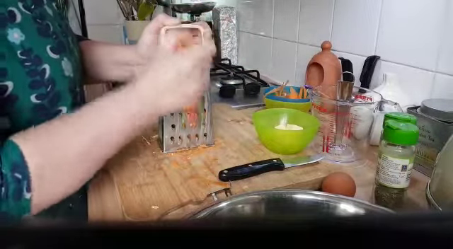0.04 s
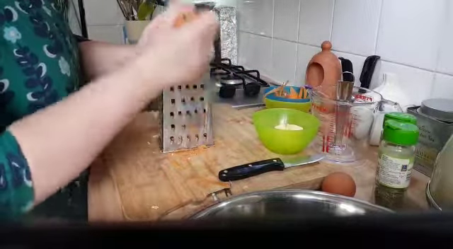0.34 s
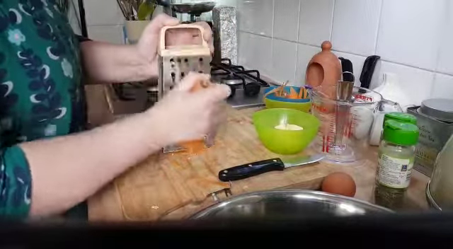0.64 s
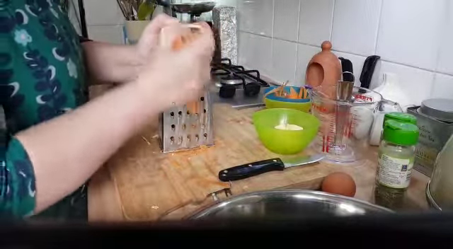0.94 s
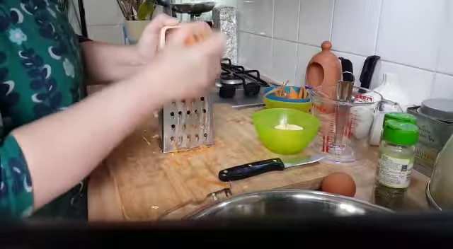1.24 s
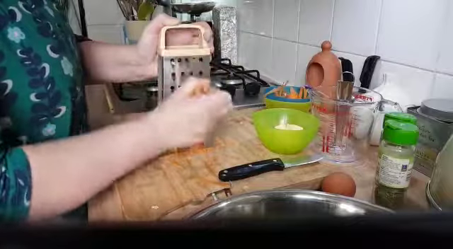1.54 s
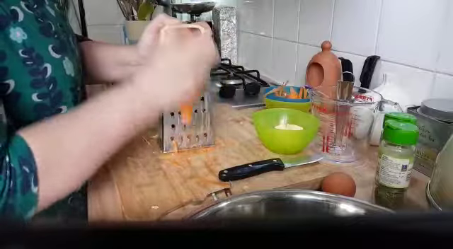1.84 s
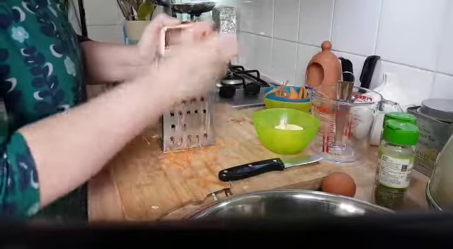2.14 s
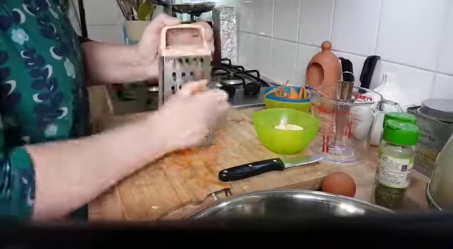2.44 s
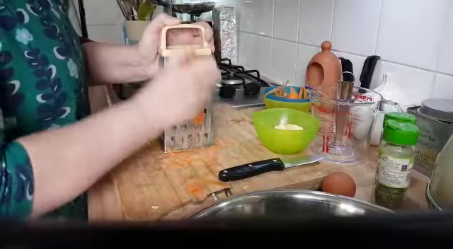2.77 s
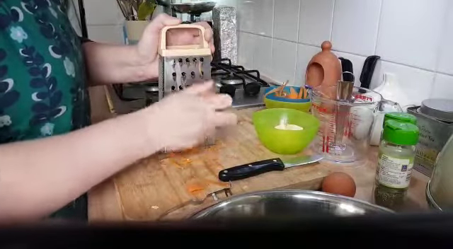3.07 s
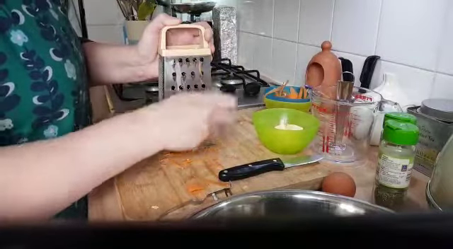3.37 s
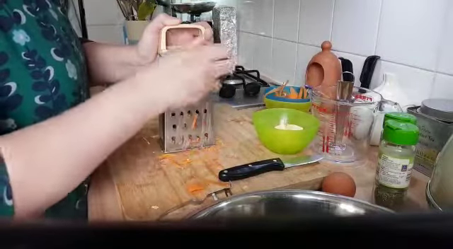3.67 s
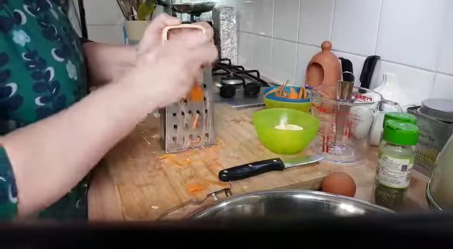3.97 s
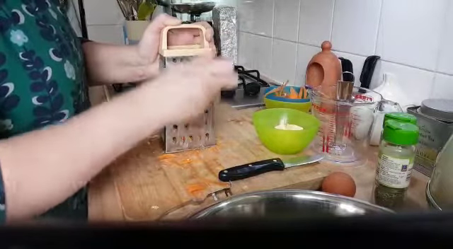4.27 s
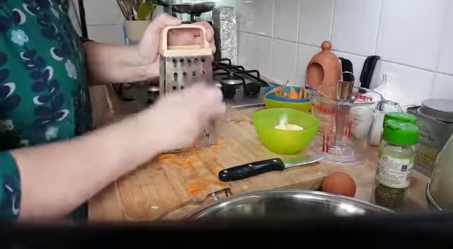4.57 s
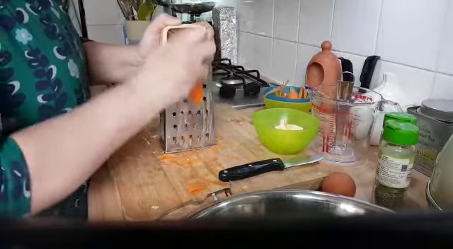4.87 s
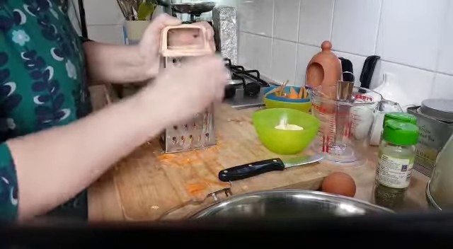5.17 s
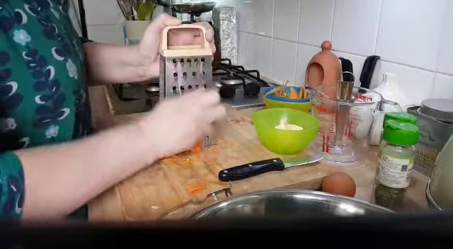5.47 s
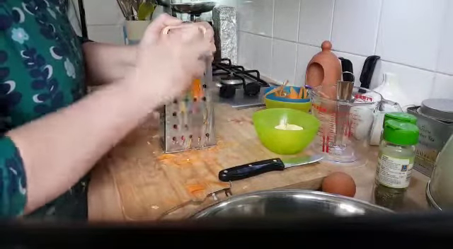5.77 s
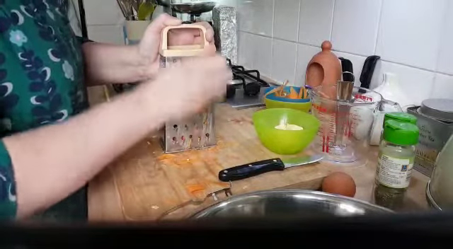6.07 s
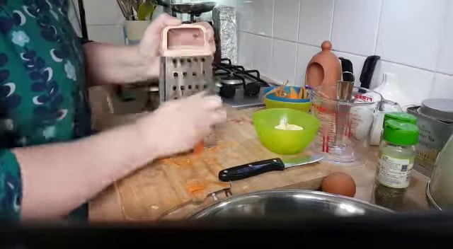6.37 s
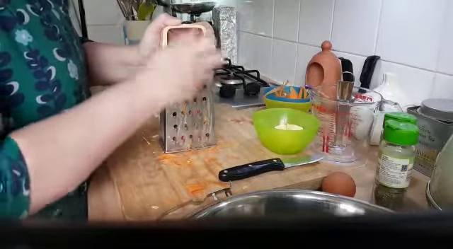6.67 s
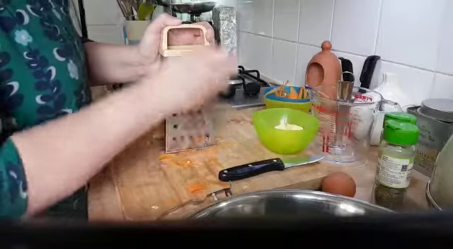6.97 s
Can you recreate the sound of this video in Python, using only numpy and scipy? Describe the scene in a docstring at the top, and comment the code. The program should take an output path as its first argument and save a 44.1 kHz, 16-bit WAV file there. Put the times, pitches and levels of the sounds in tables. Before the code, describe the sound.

A carrot is rubbed down a steel box grater about twice a second, each stroke a bright crunch with a hollow metallic rasp. Most strokes end in a dull thud through a wooden board and a brief rattle of the grater's rim, followed by a faint slide back up. The grating pauses for about a second near the middle, then resumes. It is heard from nearby in a tiled kitchen with a faint appliance hum.

```python
"""Rhythmic crunch and hollow rasp: a carrot on a steel box grater, on a wooden board in a tiled kitchen.
On each downstroke the teeth tear the fibres (bright crunch) and shake the sheet (rasp).
Most strokes end in a dull thud through the board and a brief rattle of the rim.
The carrot slides lightly back up, and once the hand pauses. Room air and appliance hum lie underneath."""
import sys
import numpy as np
from scipy import signal
from scipy.fft import rfft, irfft, next_fast_len
from scipy.io import wavfile

SR = 44100
rng = np.random.default_rng(int(sys.argv[2]) if len(sys.argv) > 2 else 0)


def unload_audio(sound):
    """Save the sound as a 16-bit wav file, at the path given as the first command line argument."""
    columns = np.transpose(np.atleast_2d(sound))
    # keep every value between -1 and 1, then stretch to whole-number steps
    steps = np.round(np.clip(columns, -1, 1) * 32767)
    wavfile.write(sys.argv[1], SR, steps.astype(np.int16))


N = 318402

# Pushes down the teeth. Levels in all tables are relative.
# t/s, length/s, bite time/s, crunch/dB, rasp/dB, swell top to foot/dB, mid-stroke arch/dB
DOWNSTROKES = [(-.024, 0.17, 0.042, -33, -32.5, 2.1, -2.5), (.407, 0.19, 0.041, -33, -34, 13.5, 6.5),
               (0.875, .2, 0.022, -32.5, -34, 13.5, 10.5), (1.333, 0.19, 0.027, -34, -34.5, 13, 3.5),
               (1.782, .158, 0.029, -32, -32, 14, 5), (2.198, 0.17, 0.031, -38.5, -38, 24.5, 0.5),
               (2.664, .197, 0.06, -36.5, -36.5, 16.5, 4.6), (3.939, 0.17, 0.027, -40.5, -37, 6.3, -3),
               (4.439, 0.19, 0.033, -33, -33, 4.5, 11), (4.86, .168, 0.044, -34, -35, 3.5, 2),
               (5.297, 0.2, 0.079, -33, -33, -0.5, -1.6), (5.753, 0.18, 0.031, -32.5, -32.5, 12, 8.5),
               (6.182, 0.16, 0.068, -35.5, -35, 11, -2), (6.628, 0.18, 0.017, -33.3, -34, 23, 15),
               (7.045, .17, .049, -36.1, -36, 23.5, 10)]


def downstrokes(bite_exponent=1.83, rasp_swell_db=5.5, crunch_stop_db_per_s=848.5, rasp_stop_db_per_s=427):
    """Crunch and rasp gains: the teeth bite, the push swells towards the foot, the carrot stops."""
    crunch, rasp = np.zeros(N), np.zeros(N)
    for start, length, bite, crunch_db, rasp_db, swell_db, arch_db in DOWNSTROKES:
        t = np.arange(N) / SR - start
        grip = np.sin(np.pi / 2 * np.clip(t / bite, 0, 1)) ** bite_exponent
        travel = np.clip(t / length, 0, 1) - .5  # top -0.5, foot +0.5
        stopped_s = np.clip(t - length, 0, 1)
        press = grip * from_db(swell_db * travel - arch_db * (2 * travel) ** 2)
        crunch += press * from_db(crunch_db - crunch_stop_db_per_s * stopped_s)
        rasp += press * from_db(rasp_db + rasp_swell_db * travel - rasp_stop_db_per_s * stopped_s)
    return crunch, rasp


# Slides back up: t/s, length/s, rub/dB, wet hiss/dB
UPSTROKES = [(0.222, 0.18, -51.5, -65), (0.684, .1, -56.5, -69), (1.185, 0.3, -51, -65),
             (1.628, 0.16, -54, -77), (2.032, 0.19, -53.5, -78), (2.537, 0.22, -78, -70.5),
             (3.824, 0.21, -60, -73), (4.18, 0.22, -58.5, -67), (4.69, 0.33, -63, -69),
             (5.124, 0.21, -55, -61.5), (5.58, 0.19, -52, -63), (6.019, 0.21, -62, -76),
             (6.442, 0.12, -57, -81), (6.87, 0.071, -60, -66)]


def upstrokes(ease_db=11.5, fade_s=0.016):
    """Hiss and rub gains: the carrot slides up with less and less weight on it."""
    hiss, rub = np.zeros(N), np.zeros(N)
    for start, length, rub_db, hiss_db in UPSTROKES:
        t = np.arange(N) / SR - start
        touch = np.clip(1 + np.minimum(t, length - t) / fade_s, 0, 1)
        weight = touch * from_db(ease_db * (.5 - np.clip(t / length, 0, 1)))
        hiss += weight * from_db(hiss_db)
        rub += weight * from_db(rub_db)
    return hiss, rub


# Scuffs on the teeth, pieces snapping off: t/s, crunch/dB, tap on the sheet/dB, t60/s
SCUFFS_AND_SNAPS = [(.352, -76, -57, 0.072), (.719, -66, -51, 0.06), (1.192, -68, -44, 0.064),
                    (1.242, -56.5, -51, 0.041), (1.293, -63.5, -50, 0.051), (1.593, -38.5, -55, 0.046),
                    (1.626, -67, -41.5, 0.079), (1.772, -86, -50, 0.073), (2.069, -70, -50, 0.037),
                    (2.104, -74, -51, 0.042), (2.3725, -28, -13.5, 0.019), (3.1313, -58, -58.5, 0.17),
                    (3.458, -84, -65.5, 0.083), (3.643, -66, -64, 0.16), (3.767, -64.5, -63, 0.094),
                    (3.819, -60, -50.5, 0.052), (4.239, -62, -53, 0.077), (4.416, -50, -51, 0.12),
                    (4.689, -61, -61, 0.052), (5.252, -74, -53, .07), (6.136, -64, -54, .1),
                    (6.3408, -19.5, -40, 0.025), (6.471, -66, -46, 0.045), (6.599, -58, -50.5, 0.14),
                    (6.899, -61, -52, .06)]
# Tearing fibres: f/Hz, density/dB
CRUNCH_SPECTRUM = [(500, -15.5), (1500, -5.5), (2600, -2), (4500, -5), (6900, -5.5), (8200, 0),
                   (9700, -3.5), (12300, -2), (13800, -5.5), (16000, -9)]


def fibres(crunch, hiss):
    """Thousands of wet cells burst each second under the teeth; bigger pieces go with a snap."""
    tearing = from_db(-3.5) * crunch * grains(per_s=7000, spread_db=1.5)
    snaps = sum(bursts([start], [db], t60, rise_share=.04) for start, db, _, t60 in SCUFFS_AND_SNAPS)
    fizz = (from_db(-10) * hiss + snaps) * grains(per_s=14000)
    return radiate(tearing + fizz, CRUNCH_SPECTRUM, band_hz=(5000, 16000))


# Shaken steel sheet: f/Hz, density/dB
RASP_SPECTRUM = [(25, -36), (45, 10.5), (90, 9), (150, -3), (250, -14), (400, -5.5), (650, -1), (1100, -6),
                 (1550, -1.5), (2100, -11.5), (2600, -18), (4500, -17), (8000, -29), (16000, -37.5)]
# Steel box resonances: f/Hz, width/Hz, lift/dB
BOX_RESONANCES = [(469.7, 31, 6.5), (629, 27, 5.5), (692, 14.2, 10), (760.3, 21, 9.5), (835, 49, 6.5),
                  (1013, 22, 5), (1058, 15, 5), (1206, 14, -3), (1325, 21, 5), (1416, 19, 0),
                  (1605, 61, 7.5), (1790, 47, 3.5), (1926, 66, 5.5), (2324, 29, 13.5), (2557, 120, 13.5),
                  (3164, 71, 11.5), (3710, 66, 8)]


def sheet(rasp, rub):
    """Each tooth that lets go plucks the steel box; the upstroke rubs it and scuffs tap it."""
    plucks = from_db(-2.5) * rasp * grains(per_s=4000, spread_db=2)
    taps = sum(bursts([start], [db], t60, rise_share=0.066) for start, _, db, t60 in SCUFFS_AND_SNAPS)
    scraping = (from_db(-10) * rub + taps) * grains(per_s=7800)
    return radiate(plucks + scraping, RASP_SPECTRUM, band_hz=(400, 2500), resonances=BOX_RESONANCES)


def steel_box(clicks, ring_db=-6.5, t60_s=0.029, hop=2048):
    """Clicks bounce inside the box, by new paths as the carrot moves from tooth to tooth."""
    decay = from_db(-60 * np.arange(2 * hop) / SR / t60_s)
    decay *= from_db(ring_db) / np.linalg.norm(decay)
    window = signal.windows.cosine(2 * hop)
    rings = np.zeros((2, N + 4 * hop))
    for start in range(0, N, hop):
        piece = clicks[:, start:start + 2 * hop]
        paths = decay * rng.standard_normal((2, 2 * hop))
        ring = signal.fftconvolve(piece * window[:piece.shape[1]], paths, axes=1)
        rings[:, start:start + ring.shape[1]] += ring
    return (clicks + rings[:, :N]) / np.hypot(1, from_db(ring_db))


# Hand landing at the foot of a stroke: t/s, thud/dB, rim rattle/dB, contact/s
LANDINGS = [(0.1359, -13.5, -30, 0.006), (0.5946, -17, -34.5, 0.0029), (1.068, -20.5, -37, .0048),
            (1.523, -26.5, -35.5, 0.0069), (1.921, -44, -39.5, 0.005), (2.373, -13, -19.5, 0.0041),
            (2.857, -15.5, -32.5, 0.0034), (3.14, -30.5, -64.5, 0.0049), (4.1063, -10.5, -29, 0.006),
            (5.021, -14.5, -27.5, 0.0078), (5.499, -15, -38, 0.0079), (5.922, -25.5, -36, 0.0074),
            (6.3434, -17, -31, 0.0036), (6.81, -25, -45, .0056)]
# Board and worktop modes: f/Hz, level/dB, t60/s
BOARD_MODES = [(49.8, -13, 0.81), (52.7, -25.5, .45), (64, 1.5, 0.06), (86.2, 6, 0.12), (117.3, 2.5, 0.039),
               (130.25, -23.5, 0.69), (158, -29, .15), (226, -27.5, 0.31)]


def board(rebound_s=.07, rebound_db=-15):
    """A soft push through the grater's foot, then a weaker one as it rocks back."""
    t = np.arange(SR) / SR
    pushes = np.zeros(N + 2 * SR)
    for start, thud_db, _, contact_s in LANDINGS:
        contact = np.sin(np.pi * np.minimum(t / contact_s, 1))
        for delay_s, push_db in (0, -1.5), (rebound_s, rebound_db):
            first = int((start + delay_s) * SR)
            pushes[first:first + SR] += from_db(thud_db + push_db) * contact / contact.sum()
    # neighbouring modes start opposed, so the thud takes a cycle to swell
    swing = sum((-1) ** k * from_db(db - 60 * t / t60) * np.sin(2 * np.pi * hz * t)
                for k, (hz, db, t60) in enumerate(BOARD_MODES))
    return signal.fftconvolve(pushes[:N], swing)[:N]


# Rim knocking on wood: f/Hz, density/dB
RIM_SPECTRUM = [(60, 5), (130, 17.5), (210, -2), (290, -7.5), (480, 1.5), (700, 2.5), (1100, -2.5),
                (1500, -9.5), (2500, -14.5), (6000, -31), (16000, -46)]


def rim(lag_s=0.0054):
    """The grater's lower rim rattles on the wood just after the hand lands."""
    times, _, rattle_db, _ = np.transpose(LANDINGS)
    envelope = from_db(-1) * bursts(times + lag_s, rattle_db, t60_s=0.077, rise_share=0.033)
    return radiate(envelope * grains(per_s=5000), RIM_SPECTRUM, band_hz=(400, 2500))


# Tiled room: f/Hz, t60/s
KITCHEN_DECAY = [(100, 0.72), (500, 0.45), (1500, 0.29), (4000, 0.31), (8000, 0.27), (16000, 0.18)]


def kitchen(sound, first_echo_s=0.0052):
    """Dense echoes from the tiles; the treble dies first."""
    t = np.arange(int(.8 * SR)) / SR
    edges_hz = np.geomspace(40, 18000, 10)
    response = np.zeros((2, len(t)))
    for low, high in zip(edges_hz, edges_hz[1:]):
        t60_s = at_hz(KITCHEN_DECAY, np.sqrt(low * high))
        decay = from_db(-60 * t / t60_s) * (t > first_echo_s)
        bandpass = signal.butter(2, [low, high], "band", fs=SR, output="sos")
        noise = signal.sosfilt(bandpass, rng.standard_normal((2, len(t))))
        response += noise * decay / np.linalg.norm(decay)
    return signal.fftconvolve(sound, response, axes=1)[:, :N]


# Room air: f/Hz, density/dB
AIR_SPECTRUM = [(20, -10.5), (50, 11.5), (90, -2), (150, -6), (250, -9), (430, -15), (680, -17),
                (1000, -23.5), (1500, -30.5), (2000, -38), (2500, -40), (7000, -43.5), (8200, -37.5),
                (13000, -33.5)]
# Appliance tones: f/Hz, level/dB
HUM_TONES = [(101, -56.5), (301, -71), (11989, -81)]


def background():
    """Quiet room air; appliances add a low hum and a faint whine in the centre."""
    t = np.arange(N) / SR
    air = radiate(rng.standard_normal((2, N)), AIR_SPECTRUM, band_hz=(400, 2500))
    hum = sum(np.sqrt(2) * from_db(db) * np.sin(2 * np.pi * hz * t + rng.uniform(0, 2 * np.pi))
              for hz, db in HUM_TONES)
    return from_db(-70.5) * air + hum * np.array([[1], [0]])


# Stereo width: f/Hz, side minus mid/dB
STEREO_WIDTH = [(60, -10), (150, -9), (330, -8.5), (500, -6.5), (770, -5), (1170, 4.5), (1800, -2),
                (4200, 1.5), (15000, 0)]


def radiate(drive, spectrum, band_hz, resonances=()):
    """Colour a mid/side drive; white noise of rms 1 gives a mid of rms 1 inside band_hz."""
    size = next_fast_len(N + SR // 2)
    hz = np.arange(size // 2 + 1) * SR / size
    lift = sum((from_db(db) ** 2 - 1) / (1 + (2 * (hz - f) / width) ** 2) for f, width, db in resonances)
    gain = from_db(at_hz(spectrum, hz)) * np.sqrt(np.maximum(1 + lift, 1e-3))
    gain /= np.sqrt(np.mean(gain ** 2 * (hz > band_hz[0]) * (hz < band_hz[1])))
    cepstrum = irfft(np.log(gain), size)[:size // 2]
    causal = np.exp(rfft(np.r_[cepstrum[0], 2 * cepstrum[1:]], size))  # rings only after the click
    stereo = [np.ones_like(hz), from_db(at_hz(STEREO_WIDTH, hz))]
    return irfft(rfft(drive, size) * causal * stereo, size)[:, :N]


def grains(per_s, spread_db=0):
    """Random mid/side clicks, rms 1."""
    onsets = rng.random(N) < per_s / SR
    sizes = from_db(spread_db * rng.standard_normal(N))
    clicks = onsets * sizes * rng.choice([-1, 1], (2, N))
    return clicks / clicks.std()


def bursts(times_s, levels_db, t60_s, rise_share):
    """Envelope that swells at each time and dies away; the rise time is a share of t60."""
    kicks = np.zeros(N)
    kicks[(np.asarray(times_s) * SR).astype(int)] = from_db(levels_db)
    fall = from_db(-60 / (t60_s * SR))
    rise = np.exp(-1 / (rise_share * t60_s * SR))
    return signal.lfilter([1 - rise], [1, -fall - rise, fall * rise], kicks + 1e-18)


def drift(rate_hz):
    """Random wander, spread about 1."""
    knots = rng.standard_normal(8192)
    return np.interp(np.arange(N) / SR * rate_hz, np.arange(len(knots)), knots)


def at_hz(points, hz):
    """Interpolate a table on a log-frequency axis."""
    knots_hz, values = np.transpose(points)
    return np.interp(np.log(np.maximum(hz, 1)), np.log(knots_hz), values)


def from_db(db):
    """Decibels to gain."""
    return 10 ** (np.asarray(db) / 20)


def scene():
    """Grating and thuds in the kitchen, mixed as mid/side, returned as left/right."""
    catching = from_db(drift(rate_hz=170))  # catch and slip shakes crunch and rasp together
    crunch, rasp = downstrokes()
    hiss, rub = upstrokes()
    clicks = fibres(crunch * catching, hiss) + sheet(rasp * catching, rub)
    grating = steel_box(clicks) + rim()
    thuds = board() * np.array([[1], [-.2]])  # slightly right
    echoes = kitchen(from_db(-8) * grating + from_db([[-14], [-3]]) * thuds)
    mid, side = grating + thuds + echoes + background()
    return np.array([mid + side, mid - side]) * from_db([[.25], [-.25]])


def record(dry, low_cut_hz=34, high_cut_hz=15800):
    """The microphones lose the deepest bass; the top is cut steeply."""
    highpass = signal.butter(4, low_cut_hz, "high", fs=SR, output="sos")
    lowpass = signal.ellip(12, .1, 90, high_cut_hz, fs=SR, output="sos")
    return signal.sosfilt(lowpass, signal.sosfilt(highpass, dry))


dry = scene()
out = record(dry)
unload_audio(out)
```